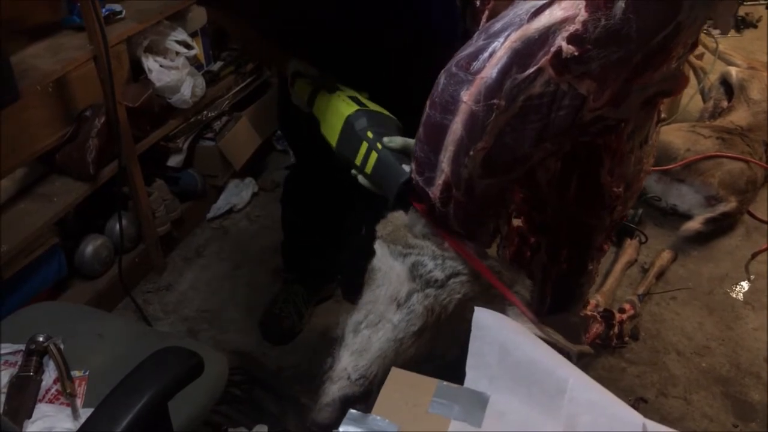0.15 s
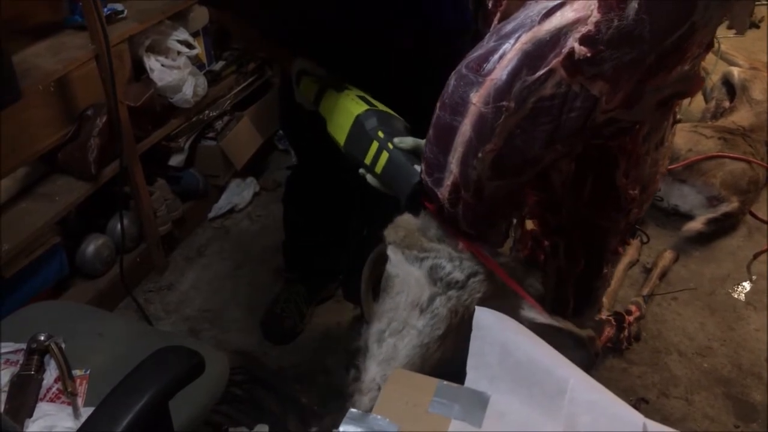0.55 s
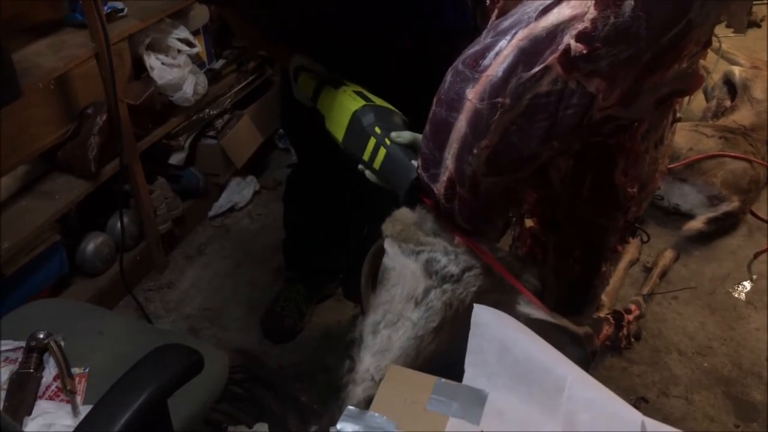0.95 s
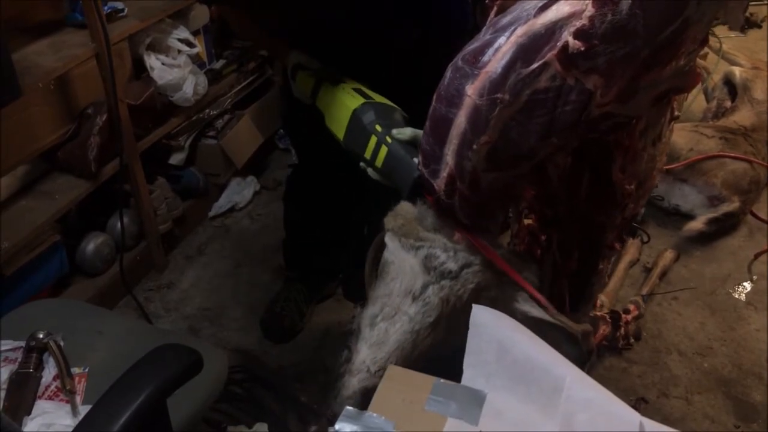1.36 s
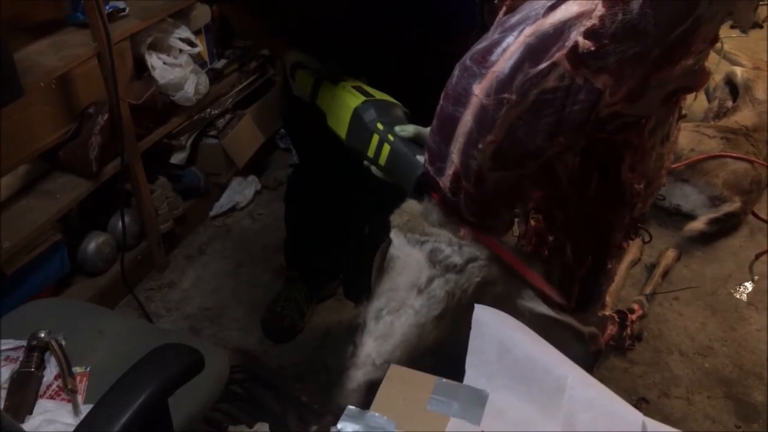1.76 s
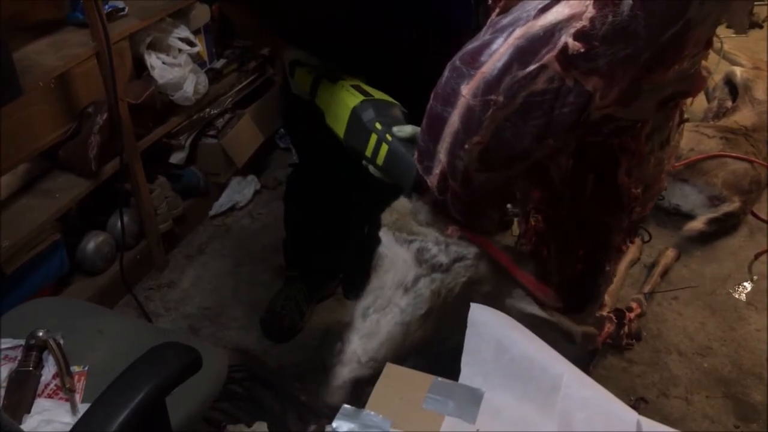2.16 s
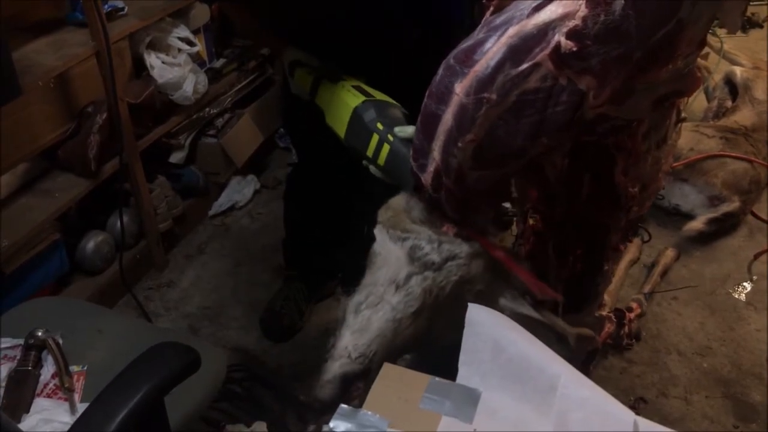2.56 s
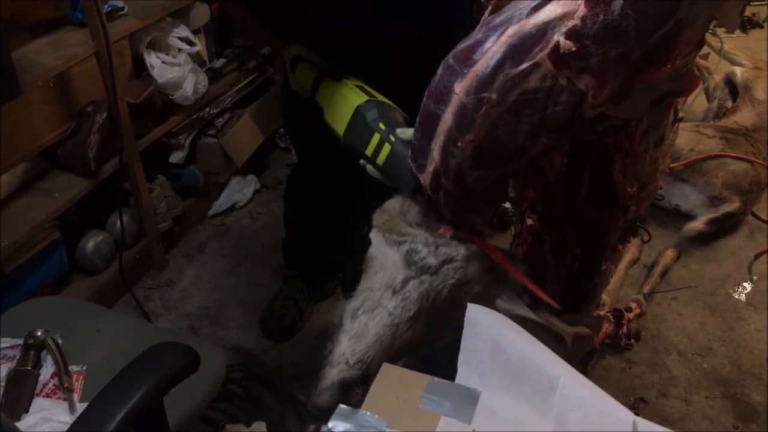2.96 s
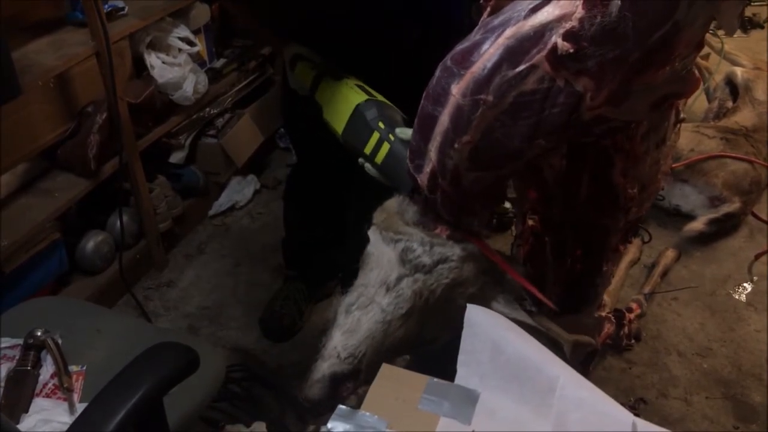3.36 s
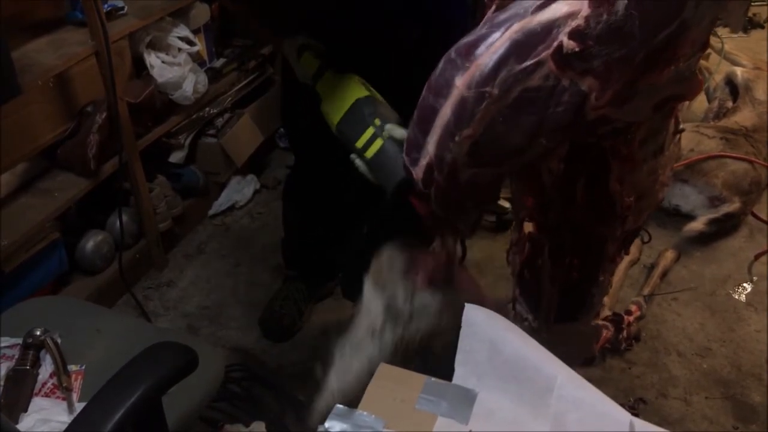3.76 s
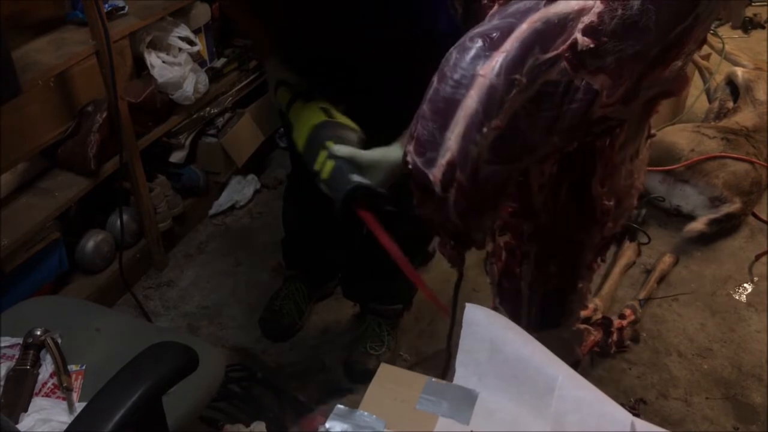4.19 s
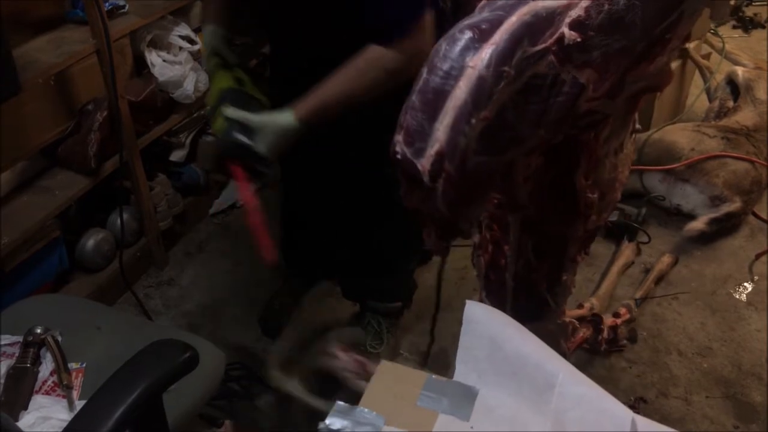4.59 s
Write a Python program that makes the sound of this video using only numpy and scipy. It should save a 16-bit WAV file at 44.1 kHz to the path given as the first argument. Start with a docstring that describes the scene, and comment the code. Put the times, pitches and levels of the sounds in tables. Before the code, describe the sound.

Close in a small garage, a cordless reciprocating saw is already running and quickly rises to full speed. Its gears rattle in a ringing housing, with gritty rasp, fan hiss and a thin high whine. The load wavers as it cuts. Near the end the trigger is let go and the motor glides downward, rattling more loosely. One microphone, same on both channels, with automatic levelling.

```python
"""A cordless reciprocating saw in a garage, already turning, runs up to speed over a mains hum and a rumble of air.
It cuts under an uneven load: gears rattle in the ringing housing once a stroke, gearbox and blade grind and rasp,
the fan hisses, the shaft sings at multiples of its turning rate and the rotor whines.
At last the trigger is let go and the motor coasts down.
One microphone, deaf near 8 kHz, feeds both channels through a slow gain control."""
import sys
import numpy as np
from scipy import signal
from scipy.fft import rfft, irfft, next_fast_len
from scipy.io import wavfile
from scipy.ndimage import uniform_filter1d, map_coordinates

SR = 44100
rng = np.random.default_rng(int(sys.argv[2]) if len(sys.argv) > 2 else 0)


def output_pcm(signal):
    """Save a mono or channel-first signal as 16-bit PCM at the path in sys.argv[1].

    Samples are clipped to [-1, 1] before scaling.
    """
    pcm = np.clip(np.atleast_2d(signal).T, -1, 1) * 32767
    wavfile.write(sys.argv[1], SR, np.round(pcm).astype(np.int16))


def field_ratio(decibels):
    """Amplitude ratio for a level in dB (20 dB per decade); scalars and array-likes work."""
    return 10 ** (np.asarray(decibels, dtype=float) / 20)


N = 208580
TIME = np.arange(N) / SR  # seconds
TURNS_PER_STROKE = 60 / 7  # motor turns for one stroke of the blade


def unit(x):
    """Scales a signal to an rms (average strength) of 1."""
    return x / np.sqrt(np.mean(x ** 2) + 1e-20)


def curves(rows):
    """Joins the rows by straight lines: one value per sample for each column after the time."""
    seconds, *columns = np.transpose(rows)
    return [np.interp(TIME, seconds, column) for column in columns]


def wobble(rate):
    """A smooth random curve through `rate` random points a second."""
    points = rng.standard_normal(int(N * rate / SR) + 4)
    return map_coordinates(points, [TIME * rate])


def filtered(x, response):
    """Multiplies the spectrum of x by a complex response of frequency."""
    size = next_fast_len(N + SR // 2)
    spectrum = rfft(x, size) * response(np.fft.rfftfreq(size, 1 / SR))
    return irfft(spectrum, size)[..., :N]


def coloured(x, points):
    """Shapes x by (Hz, dB) points joined on a logarithmic frequency axis."""
    f, db = np.transpose(points)
    return filtered(x, lambda hz: field_ratio(np.interp(np.log(hz + 1), np.log(f + 1), db)))


def noise(points, patchy_db):
    """Noise of rms 1 with the given spectrum, louder and softer in drifting patches of time and frequency."""
    z = signal.stft(rng.standard_normal(N), nperseg=512)[2]
    patches = uniform_filter1d(rng.standard_normal(z.shape), size=3, axis=0)
    patches = uniform_filter1d(patches, size=30, axis=1)
    patchy = signal.istft(z * field_ratio(patchy_db * unit(patches)), nperseg=512)[1][:N]
    return unit(coloured(patchy, points))


def hum_and_rumble():
    """A wavering mains hum at about 120 Hz under a steady rumble and hiss of air."""
    # Spectrum of the background air. Each row: frequency in Hz, relative level in dB per Hz.
    air_spectrum = [(12, -30), (20, -7), (43, -7), (70, -17), (160, -17), (270, -12.5), (400, -19.5),
                    (1000, -10.5), (1500, -18), (4500, -42), (6300, -11), (8000, -28), (16000, -40)]
    hum = np.sqrt(2) * np.sin(2 * np.pi * 119.9 * TIME + .2 * wobble(3.3))
    hum = field_ratio(0.96 * wobble(7)) * hum
    air = field_ratio(3.7) * noise(air_spectrum, patchy_db=2.5)
    return field_ratio(-50) * (hum + air)


def motion():
    """Shaft angle in turns and speed as a share of full speed; once let go, bearings and air brake the rotor."""
    # Motor shaft while the trigger is held; the last row is the release.
    # Each row: time in seconds, speed in turns per second.
    shaft_speed = [(0.0, 319.8), (0.06, 331.9), (0.12, 342.2), (0.2, 352.8), (0.3, 361.2), (0.4, 366.0),
                   (0.5, 368.6), (1.14, 375.0), (1.75, 370.8), (1.9, 368.4), (2.15, 367.4), (2.3, 363.9),
                   (2.5, 363.0), (2.7, 363.7), (3.4, 367.7), (3.6, 375.2), (3.655, 375.7)]
    bearing_drag_per_s, air_drag_per_turn = .806, .00036
    driven, = curves(shaft_speed)
    coast_s = np.maximum(TIME - shaft_speed[-1][0], 0)
    ratio = air_drag_per_turn / bearing_drag_per_s
    # exact slowing under one drag that grows with speed and one that grows with its square
    speed = 1 / ((1 / driven + ratio) * np.exp(bearing_drag_per_s * coast_s) - ratio)
    return np.cumsum(speed) / SR, speed / speed.max()


def layer_db(share, bite_db, full_db, slope_db, follows):
    """Level of a layer: dB at full speed, dB per tenfold speed, and the share of the bite it follows."""
    return full_db + slope_db * np.log10(share) + follows * bite_db


def rattle(turns, share, bite_db):
    """Gear teeth strike the housing at random, hardest once a stroke; slack grows as the motor coasts."""
    # Ringing tones of the housing. Each row: frequency in Hz, width in Hz, relative level in dB.
    housing_modes = [(1734, 124, -7), (1920, 148, -5.5), (2191, 79.4, 2.5), (2434, 160, -5.5),
                     (2844, 135, -13.5)]
    knock = np.exp(6 * (np.cos(2 * np.pi * (turns / TURNS_PER_STROKE - .12)) - 1))
    slack = 1 - share
    strength_db = (1.7 + 9 * slack) * knock + (0.36 + 3.5 * slack) * wobble(70)
    blows = field_ratio(strength_db) * rng.standard_normal(N)

    def housing(f):
        ring = 0
        for k, (centre, width, db) in enumerate(housing_modes):
            sign = (-1) ** k  # neighbouring modes move in opposite directions
            ring = ring + sign * field_ratio(db) * 1j * f * width / (centre * centre - f * f + 1j * f * width)
        # the shell radiates only around its main mode
        shell = 1j * f * 1500 / (2200 ** 2 - f * f + 1j * f * 1500)
        return ring * shell

    ring = filtered(blows, housing)
    # even out the slow level, so that speed and bite alone set it
    even = ring / np.sqrt(np.abs(uniform_filter1d(ring ** 2, SR // 2)))
    return field_ratio(layer_db(share, bite_db, -21, 35.7, 0.7)) * even


def grind(share, bite_db):
    """The low grinding of the gearbox body: noise that grows with speed."""
    # Spectrum of the gearbox body. Each row: frequency in Hz, relative level in dB per Hz.
    grind_spectrum = [(90, -52), (150, -33), (284, -11.5), (331, -13.5), (370, -9), (579, -10), (720, -2.5),
                      (818, -11.5), (900, -0.5), (1010, -5), (1200, 1), (1400, -8), (2200, -29.5),
                      (3700, -100)]
    level_db = layer_db(share, bite_db, -32.5, 35, .1) + 0.22 * wobble(9)
    return field_ratio(level_db) * noise(grind_spectrum, patchy_db=0.7)


def rasp(share, bite_db, load):
    """The rasp of brushes and blade: noise that grows with speed and wavers with the load."""
    # Spectrum of brushes and blade. Each row: frequency in Hz, relative level in dB per Hz.
    rasp_spectrum = [(900, -41), (1300, 1), (1460, 11), (1620, 6.5), (2600, 2.5), (3600, 2), (4300, -1.5),
                     (4780, -1), (4970, -6.5), (5200, 1), (5600, -7), (5870, 0), (9000, 0.5), (16000, -37)]
    level_db = layer_db(share, bite_db, -26, 55, 0.057) + 0.13 * load
    return field_ratio(level_db) * noise(rasp_spectrum, patchy_db=1.5)


def fan(share, bite_db, load):
    """The hiss of the fan: high noise that fades fastest of the noises as the motor slows."""
    # Spectrum of the fan. Each row: frequency in Hz, relative level in dB per Hz.
    fan_spectrum = [(4000, -9.5), (8000, -8), (11000, -0.5), (13000, -5.5), (16000, -2.5)]
    level_db = layer_db(share, bite_db, -28.5, 68, 0.22) + 0.56 * load + .4 * wobble(7.5)
    return field_ratio(level_db) * noise(fan_spectrum, patchy_db=2.3)


def tones(turns, share):
    """Tones locked to shaft and stroke, wavering in level and phase; they die fast once the motor slows."""
    # Gear tones. Each row: cycles per turn, cycles per stroke added, middle level at full speed in dB.
    gear_tones = [(0, 1, -61), (1, 0, -60), (2, -1, -55), (2, 0, -50), (3, 0, -51), (4, 0, -34.5),
                  (5, 0, -43), (6, -2, -35), (6, -1, -30), (6, 0, -38), (6, 1, -39), (7, 0, -47),
                  (8, 0, -54), (10, 0, -56), (13, 0, -55), (14, 0, -52), (16, 0, -57)]
    fall_db = 110 * np.log10(share)
    total = 0
    for per_turn, per_stroke, db in gear_tones:
        cycles = (per_turn + per_stroke / TURNS_PER_STROKE) * turns
        swing_db = 2.2 * wobble(12)
        slip = .5 * wobble(10)  # radians
        total = total + field_ratio(db + fall_db + swing_db) * np.sin(2 * np.pi * cycles + slip)
    return np.sqrt(2) * total


def whine(turns, share):
    """The thin high tone of the rotor, 39 cycles a turn, weaker as it slows."""
    flutter_db = 1.3 * wobble(9) + 3.5 * wobble(50)
    quiver = .7 * wobble(45)  # radians
    fall_db = 53 * np.log10(share)
    return np.sqrt(2) * field_ratio(-37.0 + fall_db + flutter_db) * np.sin(2 * np.pi * 39 * turns + quiver)


def saw():
    """All that the tool radiates: every layer grows with speed, the noises also with the bite of the blade."""
    # How hard the blade bites; each noise layer follows a share of it. Each row: time in seconds, bite in dB.
    blade_bite = [(0.0, -0.5), (0.5, 0.5), (0.68, 3.5), (0.8, -1), (1.03, 0.5), (1.15, -0.5), (1.55, 1),
                  (2.1, -.7), (2.45, -.3), (2.58, 3.5), (2.7, -2.7), (2.85, 1), (3.4, 0.5), (3.53, 4),
                  (3.65, -4), (3.75, -0.5), (4.4, -1.5), (4.5, 3.5), (4.6, -0.2)]
    turns, share = motion()
    bite_db, = curves(blade_bite)
    load = wobble(7.4)  # the blade bites unevenly
    noises = rattle(turns, share, bite_db) + grind(share, bite_db)
    noises = noises + rasp(share, bite_db, load) + fan(share, bite_db, load)
    return noises + tones(turns, share) + whine(turns, share)


def walls(x):
    """The garage's echo: a noise tail in which each frequency dies at its own speed."""
    # Each row: frequency in Hz, time to die by 60 dB in seconds.
    wall_decay = [(100, 0.27), (2000, 0.18), (8000, 0.11), (16000, 0.11)]
    hz, t, z = signal.stft(rng.standard_normal(SR // 2), SR, nperseg=256)
    f, t60 = np.transpose(wall_decay)
    decay_s = np.interp(np.log(hz + 1), np.log(f), t60)[:, None]
    tail = signal.istft(z * field_ratio(-60 * t / decay_s), SR, nperseg=256)[1]
    late = np.pad(x, (300, 0))  # the echo starts 300 samples late
    return signal.fftconvolve(late, tail / np.linalg.norm(tail))[:N]


def scene():
    """The saw, its echo and the background, alike on both channels."""
    background = hum_and_rumble()
    tool = saw()
    echo = field_ratio(-14) * walls(tool)
    return np.tile(tool + echo + background, (2, 1))


def microphone(x):
    """Colours the sound as the microphone hears it, with a notch near 8 kHz."""
    # Each row: frequency in Hz, gain in dB.
    microphone_gain = [(20, -5), (6100, 1.5), (7000, -11), (7900, -26), (8600, -25.5), (9600, -11),
                       (10600, -5.5), (11500, 6), (12400, 4), (13500, -4.5), (15700, -10.5)]
    return coloured(x, microphone_gain)


def gain_control(x):
    """Turns down what is loud and up what is quiet, following the level with a lag."""
    steady_db, squeeze = -17.5, 0.65  # level left alone in dB; dB of gain per dB of level
    lag_s, start_db = 0.19, 7.5  # lag in seconds; gain at the start in dB
    level_db = 10 * np.log10(np.abs(uniform_filter1d(x[0] ** 2, SR // 20)) + 1e-9)
    keep = np.exp(-1 / (lag_s * SR))
    wanted_db = squeeze * (steady_db - level_db)
    gain_db = signal.lfilter([1 - keep], [1, -keep], wanted_db, zi=[start_db])[0]
    return x * field_ratio(gain_db)


def round_peaks(x):
    """Bends the peaks over softly so that they stay below 0.68."""
    return x / (1 + np.abs(x / .68) ** 5) ** (1 / 5)


def low_pass(x):
    """Removes everything above the highest recorded frequency."""
    return signal.sosfilt(signal.butter(12, 15700, fs=SR, output="sos"), x)


def record(dry):
    """Microphone colour, slow gain control and softly rounded peaks."""
    levelled = gain_control(microphone(dry))
    mix = round_peaks(levelled)
    return low_pass(mix)


dry = scene()
out = record(dry)
output_pcm(out)
```